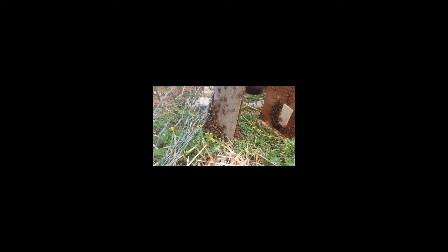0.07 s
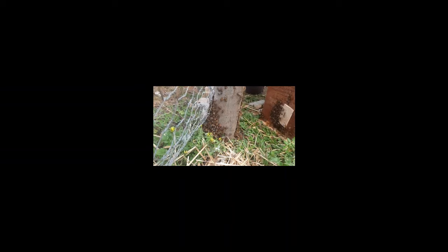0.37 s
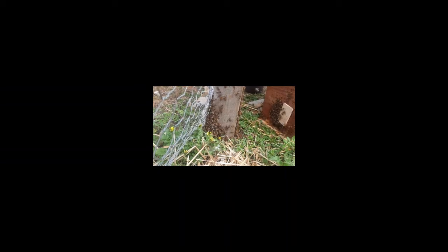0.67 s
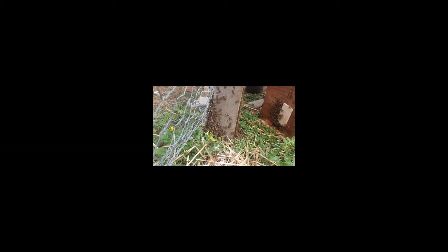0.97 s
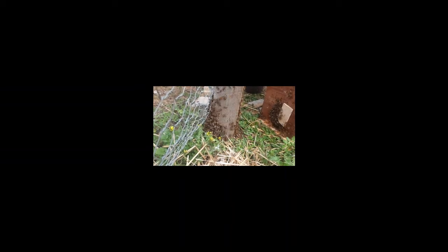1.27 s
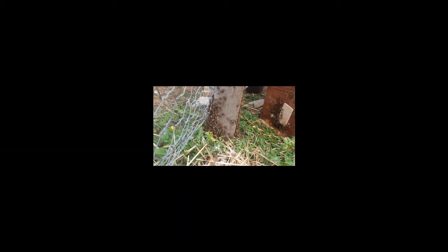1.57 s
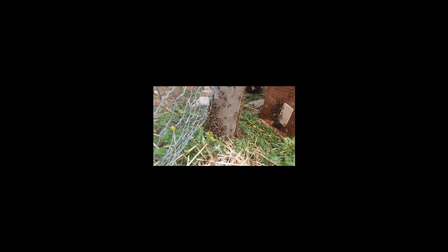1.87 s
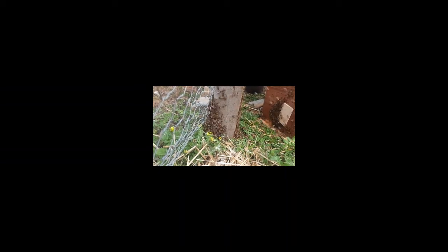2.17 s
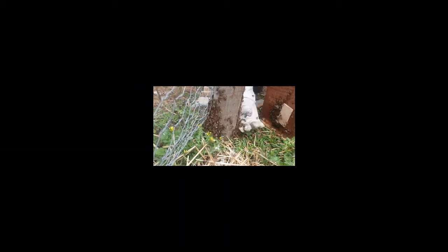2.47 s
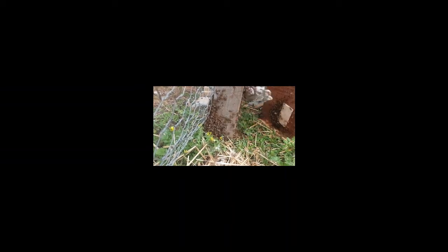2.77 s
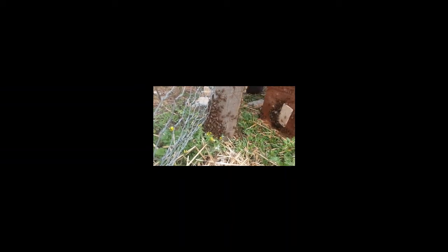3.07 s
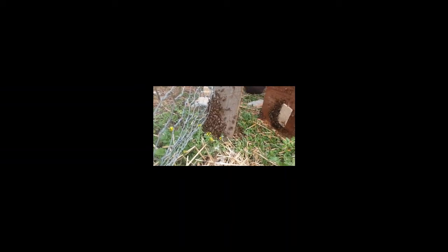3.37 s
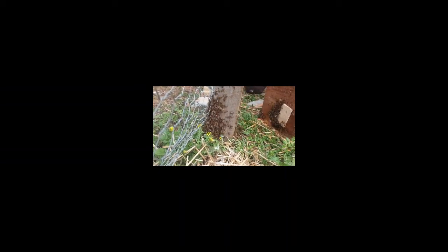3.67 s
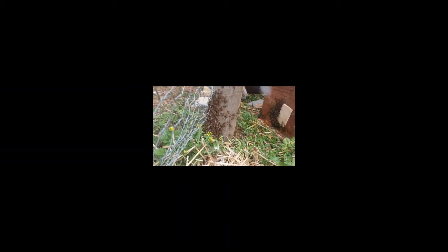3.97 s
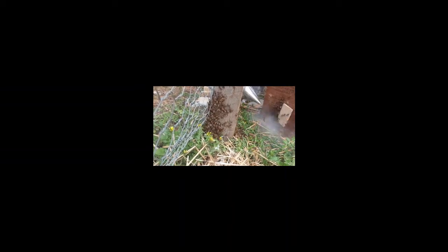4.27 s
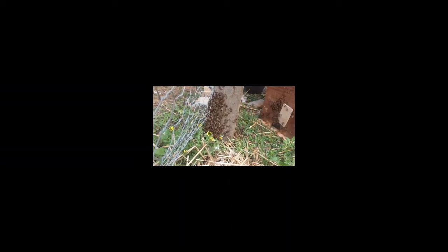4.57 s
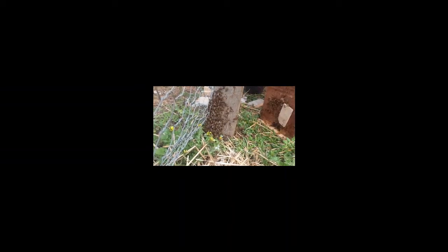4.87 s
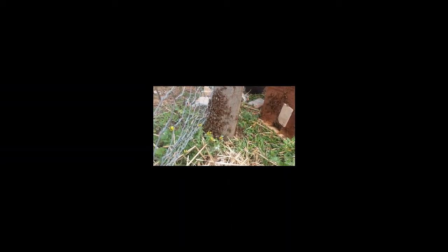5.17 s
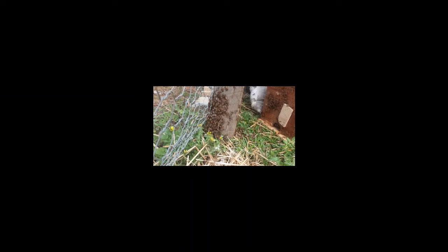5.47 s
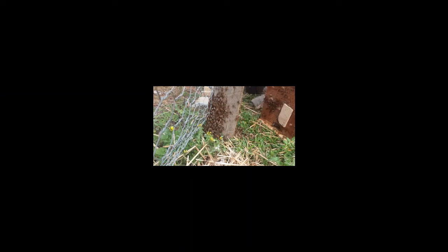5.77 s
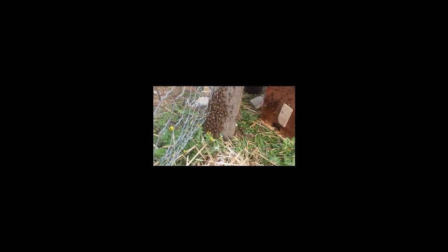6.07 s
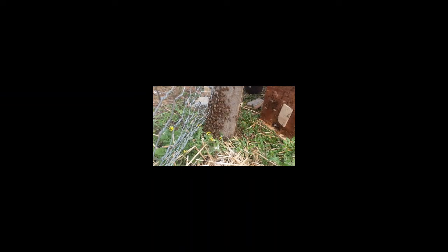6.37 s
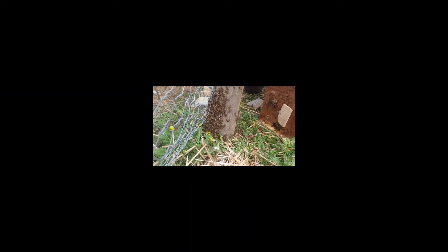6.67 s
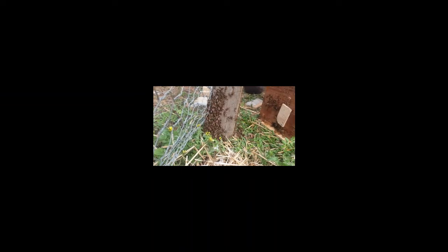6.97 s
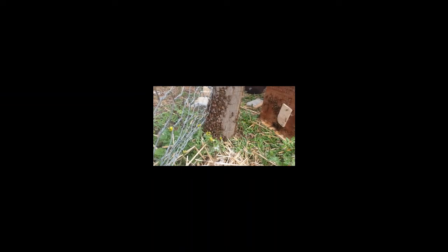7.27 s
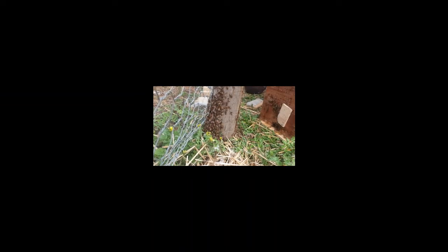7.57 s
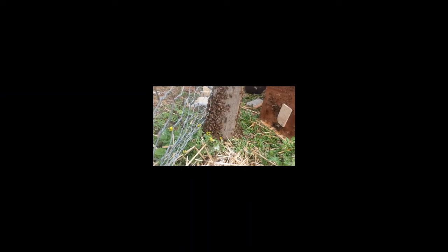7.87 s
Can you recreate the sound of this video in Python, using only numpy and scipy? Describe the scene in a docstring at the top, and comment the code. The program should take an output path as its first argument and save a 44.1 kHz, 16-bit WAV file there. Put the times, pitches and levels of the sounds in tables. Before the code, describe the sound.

Many bees buzz close by over a low outdoor rumble, with quick fly-bys, soft air bumps and faint, distant bird chirps.

```python
"""A honeybee swarm hums throughout on the right microphone, over a bed of outdoor rumble.
From the start, puffs of air buffet the nearly deaf left microphone, and eddies bump the right one.
A small, distant bird twitters, wings rasp on dry stalks, and single bees dart past with a drop in
pitch, most thickly from about 2 s to 5 s. After 7 s the bird is at its loudest, amid more fly-bys."""
import sys
import numpy as np
from scipy import signal
from scipy.fft import rfft, irfft, next_fast_len
from scipy.io import wavfile

SR = 44100
rng = np.random.default_rng(int(sys.argv[2]) if len(sys.argv) > 2 else 0)


def store_wav(level_fs):
    """Save 16-bit WAV to argv[1]."""
    pcm = np.round(np.clip(np.atleast_2d(level_fs), -1, 1) * 32767)
    wavfile.write(sys.argv[1], SR, pcm.T.astype(np.int16))


N = 358533
TIME = np.arange(N) / SR
EDGE_HZ = 15680

# bees darting past: nearest t/s, wingbeat f/Hz, level/dB, half-width/s, brightness/dB, fizz change/dB
FLY_BYS = [(.568, 247, -43, 0.014, -2, -3), (1.897, 270.5, -30.5, 0.0083, -5, 4.5),
           (1.992, 245.5, -47, 0.023, -3, 1.5), (2.065, 225.4, -45.5, 0.014, 7.5, 3),
           (2.222, 240.4, -36, 0.01, -7, 3.5), (2.301, 247.6, -37, 0.015, -6.5, 4.5),
           (2.371, 246.3, -26.5, 0.0072, -10.5, 4.5), (2.482, 250.6, -42, 0.016, -0.5, 2),
           (2.53, 254, -38.5, 0.008, -5, 2.5), (2.854, 234.4, -50, 0.0066, 7, 2),
           (2.896, 250.5, -34, 0.018, -7.5, -3), (2.961, 265.8, -30, 0.0085, -7, 2.5),
           (3.042, 248.6, -42, .012, -7, -4), (3.233, 245, -38.5, 0.018, -12, 2),
           (3.319, 259.7, -34.5, 0.014, -7.5, 6.5), (3.348, 258, -50, 0.013, 5, 9),
           (3.52, 250, -41.5, .02, -5, 1), (3.712, 257, -41.5, 0.034, -7, -0.5),
           (3.798, 238, -41, .011, -12, 0.5), (3.905, 250.3, -38, 0.022, -6, 5),
           (4.27, 236.5, -44, .025, -5, 1), (4.451, 259, -50, .021, 7, 2.5),
           (4.492, 273, -42.5, .012, -9, 1), (4.892, 245.8, -33.5, 0.0094, -9, 5),
           (5.694, 249, -36.5, 0.017, -7, 2), (5.87, 245.5, -40.5, 0.021, -16, 1),
           (5.932, 242.4, -49, 0.017, -2, 4), (6.919, 251.3, -40.5, 0.018, -3, 0),
           (7.185, 220.2, -36.5, 0.0093, -3.5, -1.5), (7.417, 255.7, -32.5, 0.0033, -7, -2),
           (7.465, 245.4, -39, 0.011, -8, -3.5), (7.504, 235.5, -42.5, 0.012, -2.5, 3),
           (7.722, 215.5, -37.5, 0.011, -12, -1), (7.804, 234.5, -37, 0.0076, -4.5, -10),
           (7.95, 238, -51, 0.017, 4, 1)]
# tone of the wingbeat's harmonics: f/Hz, level/dB
WING_EQ = [(180, 2.5), (260, 0.5), (420, 3), (545, 2.5), (640, -10), (850, -18.5), (1040, -9), (1170, -9),
           (1300, -7.5), (1700, -11.5), (2300, -14.5), (4500, -20.5), (12500, -40), (15500, -34)]
# notches of the right microphone's port: f/Hz, level/dB
PORT_EQ = [(2350, -2.5), (2700, -11.5), (2950, -17), (3250, -15.5), (3700, -8.5), (4500, -1), (5300, -1.5),
           (6050, -9), (6700, -23.5), (7600, -8), (8600, -18), (11000, -3), (12900, 5), (13500, -16),
           (15500, -14)]


def amp(db):
    """Decibels to gain."""
    return 10 ** (np.asarray(db) / 20)


def unit(x):
    """Scales to rms 1."""
    return x / np.sqrt(np.mean(x ** 2) + 1e-20)


def colour(x, curve):
    """Applies an EQ curve of f/Hz, level/dB points."""
    hz, db = np.transpose(curve)
    size = next_fast_len(len(x))
    log_f = np.log(np.fft.rfftfreq(size, 1 / SR) + 1)
    gain = amp(np.interp(log_f, np.log(hz + 1), db))
    return irfft(rfft(x, size) * gain, size)[:len(x)]


def noise(curve, size=N):
    """Steady noise of rms 1, shaped by an EQ curve."""
    return unit(colour(rng.standard_normal(size), curve))


def drift(t, rate_hz, count=12):
    """Slow random wandering of rms about 1."""
    speed, phase = rng.random((2, count, 1))
    return np.sin(2 * np.pi * (rate_hz * speed * t + phase)).sum(0) * np.sqrt(2 / count)


def around(size=8192):
    """Seconds before and after the middle of a short event."""
    return (np.arange(size) - size // 2) / SR


def add(mix, when, sound):
    """Mixes a sound in, centred on the given second."""
    start = round(when * SR) - len(sound) // 2
    part = mix[max(start, 0):max(start + len(sound), 0)]
    part += sound[max(-start, 0):][:len(part)]


def wingbeat(turns, scatter_rad=1.29, harmonics=60, size=2048):
    """One sharp push of air per wing stroke; each bee smears its harmonics in its own way."""
    phase = scatter_rad * rng.standard_normal(harmonics) + 2 * np.pi * rng.random()
    cycle = unit(irfft(np.r_[0, np.exp(1j * phase)], size))
    return cycle[(turns * size).astype(int) % size]


def swarm(count=32, top_hz=267, spread_hz=72, waver=.033, roam_db=4.5, hum_trim_db=9, fizz_trim_db=39):
    """Many bees, most beating near the top rate, waver in pitch and drift nearer and farther."""
    # the swarm thickens and thins: t/s, hum level/dB, wing fizz level/dB (both before trim)
    faders = [(0.0, -54, -85.5), (1.47, -54, -86.5), (1.79, -53, -84.5), (2.17, -51.5, -83),
              (2.74, -52, -84), (3.06, -50, -79.5), (3.35, -52, -87.5), (3.67, -52, -82),
              (4.21, -52.5, -83.5), (5.0, -52, -84), (5.16, -54, -87), (5.73, -52.5, -83),
              (6.02, -54, -87.5), (6.5, -52.5, -86), (7.11, -52, -80.5), (7.31, -52, -82), (7.86, -53, -81),
              (8.13, -53, -83)]
    t = np.linspace(0, TIME[-1], num=N // 256)
    hum = np.zeros(N)
    for rank in (np.arange(count) + .5) / count:
        hz = (top_hz - spread_hz * rank ** 1.6) * (1 + waver * drift(t, rate_hz=7))
        turns = np.cumsum(hz) * t[1] + rng.random()
        nearness = amp(roam_db * drift(t, rate_hz=10))
        hum += np.interp(TIME, t, nearness) * wingbeat(np.interp(TIME, t, turns))
    hum = unit(colour(hum, WING_EQ))
    fizz = colour(hum, [(1500, -11.5), (4500, -7.5), (8000, 3.5)])
    cues, hum_db, fizz_db = np.transpose(faders)
    surge = drift(t, rate_hz=11)  # moves the whole cloud, its fizz more than its hum
    # the fizz flares, or sometimes ducks, as a bee comes close
    flare_db = sum(db * np.exp(-.5 * ((t - when) / 0.02) ** 2) for when, *_, db in FLY_BYS)
    hum_gain = amp(hum_trim_db + np.interp(t, cues, hum_db) + 0.66 * surge)
    fizz_gain = amp(fizz_trim_db + np.interp(t, cues, fizz_db) + 0.9 * surge + flare_db)
    return np.interp(TIME, t, hum_gain) * (hum - fizz) + np.interp(TIME, t, fizz_gain) * fizz


def outdoor_air(level_db=-54, gust_db=1.6):
    """A bed of rumble that rises and falls with the breeze."""
    # outdoor rumble and wash: f/Hz, level/dB
    air_eq = [(15, -15), (30, -24), (62, 2.5), (95, -5.5), (130, -4), (330, -9.5), (650, -15), (1000, -18),
              (3000, -36.5), (15000, -49.5)]
    t = TIME[::256]
    breeze = np.interp(TIME, t, drift(t, rate_hz=9))
    return amp(level_db + gust_db * breeze) * noise(air_eq)


def microphone_hiss(level_db=-77.5):
    """The left microphone's own steady noise floor."""
    # tone of the hiss: f/Hz, level/dB
    hiss_eq = [(20, 9), (60, 1), (150, -7), (500, -10), (700, -10), (2200, -11), (2900, -14), (5300, -20.5),
               (7600, -26.5), (10000, -18.5), (13300, -13.5), (15500, -13.5)]
    return amp(level_db) * noise(hiss_eq)


def wind_puffs(linger_s=0.03, skirt=3.5, calm_db=-88):
    """Each puff swells and dies away on the left port, leaving a low rumble that lingers."""
    # puffs of air: t/s, level/dB, half-width/s
    puffs = [(0.0, -52.5, 0.021), (0.381, -42.5, 0.011), (0.427, -36, 0.012), (.51, -60, .03),
             (.573, -54, 0.023), (0.667, -46.5, 0.015), (0.792, -57, .012), (0.898, -65, 0.038),
             (.995, -65, 0.016), (1.15, -45.5, 0.011), (1.233, -61, .014), (1.405, -54.5, 0.019),
             (1.647, -57, 0.016), (1.785, -61, .012), (1.991, -51, 0.014), (2.065, -48, 0.014),
             (2.19, -52.5, .012), (2.331, -47.5, .015), (2.442, -61, .016), (2.86, -65, .008),
             (3.008, -61.5, 0.024), (3.168, -41.5, 0.012), (3.21, -59, 0.023), (3.766, -72, .01),
             (4.26, -47, 0.012), (4.383, -51.5, 0.02), (4.9, -67, 0.016), (5.141, -72, .012),
             (5.345, -56, 0.02), (5.985, -62, .014), (6.07, -63, 0.037), (6.843, -50.5, 0.014),
             (7.157, -70, .012), (7.995, -68, .008)]
    # turbulence of a puff: f/Hz, level/dB
    turbulence_eq = [(30, -16), (90, 7.5), (160, 8.5), (250, 2), (500, -4.5), (650, -12.5), (1050, -10.5),
                     (1300, -22.5), (1700, -18.5), (2300, -33), (3100, -46), (6000, -79)]
    t = TIME[::64]
    gusts = sum(amp(db) * (1 + ((t - when) / half) ** 2 / skirt) ** (-skirt / 2)
                for when, db, half in puffs)
    strength = amp(calm_db) + np.interp(TIME, t, gusts)
    decay = np.exp(-1 / (linger_s * SR))
    lingering = signal.lfilter([1 - decay], [1, -decay], strength)
    rumble = noise([(15, -30), (35, -5), (60, -1), (130, -16.5), (220, -20.5), (800, -72)])
    return strength * noise(turbulence_eq) + lingering * rumble


def eddy_bumps(sag=0.0747, churn=.55):
    """A few uneven low cycles, sagging in pitch, where an eddy touches the right microphone."""
    # soft bumps of air: t/s, f/Hz, level/dB, half-width/s
    bumps = [(0.066, 127.3, -46, 0.024), (0.281, 93.5, -49, 0.011), (.426, 164.3, -43, 0.0087),
             (.572, 150, -38, 0.0064), (1.702, 66.3, -46, 0.0091), (1.969, 63.3, -49.5, 0.018),
             (2.065, 128, -46, .011), (2.141, 60.6, -49, 0.019), (2.26, 64, -41, 0.0093),
             (2.305, 121, -43.5, 0.021), (2.367, 70, -41, 0.0031), (2.862, 51.7, -49, 0.011),
             (3.124, 126, -44.5, 0.025), (3.654, 118.8, -35, 0.0038), (3.926, 104, -47, 0.014),
             (4.111, 119.7, -47, 0.01), (4.89, 165, -44, 0.0068), (5.224, 173.8, -38.5, 0.0034),
             (6.503, 53.3, -44.5, 0.012), (6.944, 111, -46, 0.01), (7.077, 115.5, -49, 0.01),
             (7.382, 162, -43, .014), (7.823, 85, -46, 0.0077)]
    out, t = np.zeros(N), around()
    for when, hz, db, half in bumps:
        turns = np.cumsum(hz * (1 - sag * np.tanh(t / half))) / SR + rng.random()
        eddy = noise([(25, -10), (hz, 0), (2 * hz, -6), (700, -20), (3000, -55)], len(t))
        push = unit(np.sin(2 * np.pi * turns) + churn * eddy)
        add(out, when, amp(db) * push * np.exp(-.5 * (t / half) ** 2))
    return out


def bird_chirps(twitter_count=110, trill_hz=240, trim_db=1, rasp=0.47, waver=0.0605, overtone_db=-24):
    """A distant bird's brief, trilled notes; the scratchy ones waver in pitch and rasp."""
    # main chirps: t/s, f/Hz, level/dB before trim, scratchiness/0-1
    chirps = [(.187, 4900, -55.5, .6), (.231, 5550, -58.5, 0.5), (.781, 5320, -64, .5),
              (.808, 4300, -61.5, .7), (1.579, 4980, -60, .7), (1.83, 3710, -60, .9),
              (1.922, 4600, -54.5, 1), (2.128, 5140, -61, 0.65), (2.702, 4000, -62, 0.5),
              (3.242, 3860, -61, 0.5), (4.09, 3030, -64, .1), (4.09, 4420, -54, .15),
              (4.138, 4370, -59.5, .3), (4.29, 4120, -60, .7), (5.431, 4700, -58, .4),
              (6.039, 5150, -60, .4), (6.938, 5430, -63, .4), (7.066, 4610, -48, 0.37),
              (7.127, 4480, -48.5, 0.25), (7.176, 4830, -54, .55), (7.228, 4460, -46, 0.26),
              (7.262, 5820, -55, .35), (7.295, 5640, -58.5, .4), (7.37, 5210, -52.5, 0.57),
              (7.423, 4910, -63, .1), (7.464, 5570, -59, 0.4), (7.57, 4500, -58, 0.6),
              (7.692, 5730, -57.5, 0.6), (7.755, 5100, -59, .5), (7.802, 4170, -56, 0.6),
              (7.82, 5450, -61, .5), (7.895, 4650, -57, 0.37), (8.092, 4360, -55.5, 0.5)]
    # fainter twitters scattered between them, same columns
    twitters = rng.uniform((0, 3700, -72, .3), (TIME[-1], 5500, -66, 1), (twitter_count, 4))
    rasp_eq = [(2400, -16), (3600, 7), (5400, -2), (6800, -10.5), (9500, -23), (13000, -16),
               (15000, -45)]
    out, t = np.zeros(N), around(size=4096)
    for when, hz, db, scratch in np.vstack([chirps, twitters]):
        half = 0.0089 * rng.uniform(0.98, 1.05)
        pitch = hz * (1 + waver * scratch * drift(t, rate_hz=570))
        phase = 2 * np.pi * np.cumsum(pitch) / SR
        overtones = np.sin(2 * phase) + np.sin(3 * phase) * (3 * hz < EDGE_HZ)
        note = np.sin(phase) + amp(overtone_db) * colour(overtones, PORT_EQ)
        note += rasp * scratch * noise(rasp_eq, len(t))
        note *= 1 + .5 * np.sin(2 * np.pi * (trill_hz * t + rng.random()))
        add(out, when, amp(db + trim_db) * unit(note) * np.exp(-.5 * abs(t / half) ** 3))
    return out


def wing_rasps(beat_hz=245):
    """A handful of wing strokes scrape a dry stalk: noise pulsing at the wingbeat."""
    # brushes with a stalk: t/s, level/dB, half-width/s, top f/Hz
    rasps = [(0.431, -47, 0.01, 2000), (1.898, -42.5, 0.0054, 890), (2.596, -38.5, 0.0093, 3880),
             (4.39, -49.5, 0.01, 794), (5.151, -47.5, 0.01, 2980), (5.45, -52, 0.007, 2600)]
    out, t = np.zeros(N), around()
    for when, db, half, top_hz in rasps:
        scrape = rng.standard_normal(len(t)) * (1 + .5 * np.cos(2 * np.pi * beat_hz * t))
        scrape = colour(scrape, [(250, -12), (600, 5.5), (1000, -2), (2000, 3.5), (4000, 3)])
        scrape = colour(scrape, [(top_hz, 0), (1.2 * top_hz, -14), (2 * top_hz, -38)])  # high cut
        scrape = unit(colour(scrape, PORT_EQ))
        add(out, when, amp(db) * scrape * np.exp(-.5 * abs(t / half) ** 4))
    return out


def fly_bys(doppler=.035, whoosh=0.3):
    """A close bee swells and fades in a moment, its pitch dropping as it goes by, with a rush of air."""
    out, t = np.zeros(N), around()
    for when, hz, db, half, bright_db, _ in FLY_BYS:
        distance = np.hypot(1, t / half)  # 1 at the nearest point
        turns = np.cumsum(hz * (1 - doppler * t / half / distance)) / SR
        buzz = wingbeat(turns) + whoosh * rng.standard_normal(len(t))
        buzz = unit(colour(buzz, WING_EQ))
        buzz = colour(buzz, [(100, -3), (280, 3.5), (500, -1), (750, bright_db + 7),
                             (1200, bright_db), (4500, bright_db + 2.5), (10000, bright_db)])
        add(out, when, amp(db) * buzz / distance ** 2.85)  # a wing's near field dies away steeply
    return out


def scene(trace_db=-45.5):
    """Bees, bird and outdoor air on the right; puffs, hiss and a faint trace of the rest on the left."""
    bees = swarm() + fly_bys()
    right = colour(bees + outdoor_air(), PORT_EQ) + eddy_bumps() + wing_rasps() + bird_chirps()
    left = wind_puffs() + amp(trace_db) * right + microphone_hiss()
    return np.array([left, right])


def record(dry):
    low_pass = signal.firwin(1023, EDGE_HZ, window=("kaiser", 9), fs=SR)
    return signal.oaconvolve(dry, low_pass[None], "same")


dry = scene()
out = record(dry)
store_wav(out)
```